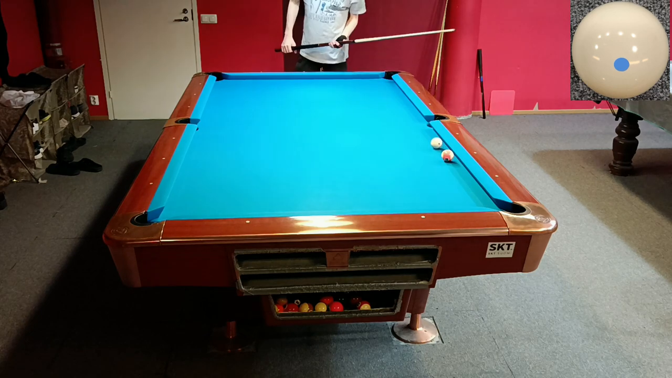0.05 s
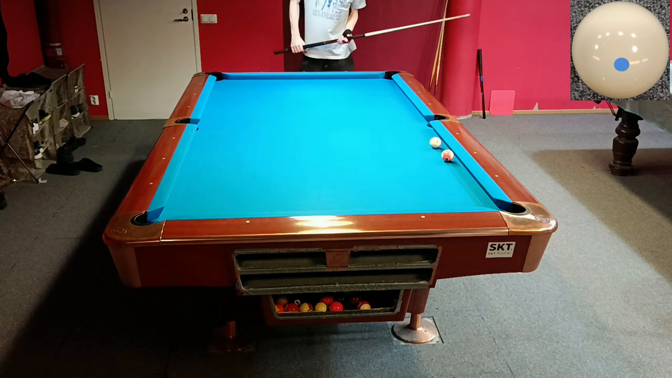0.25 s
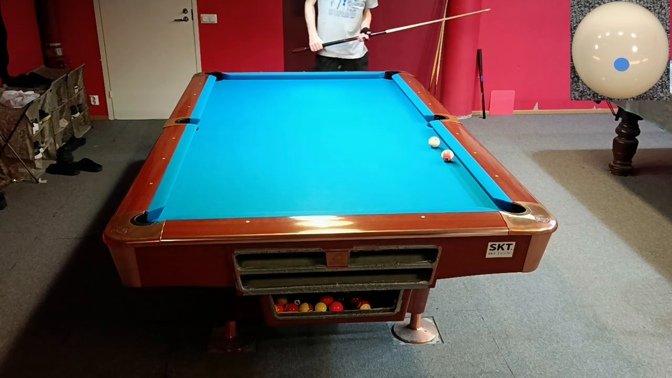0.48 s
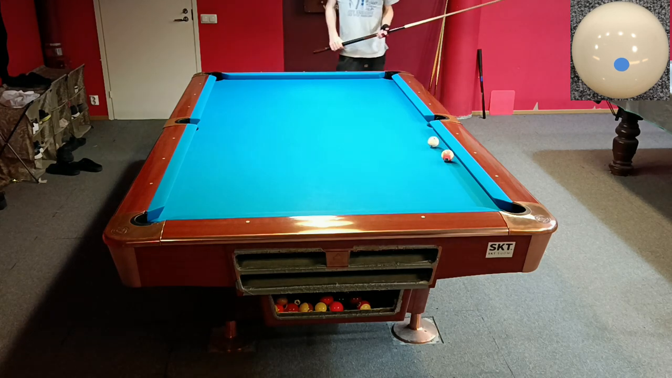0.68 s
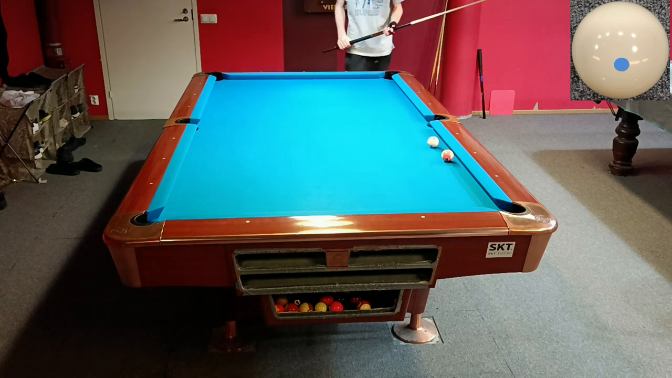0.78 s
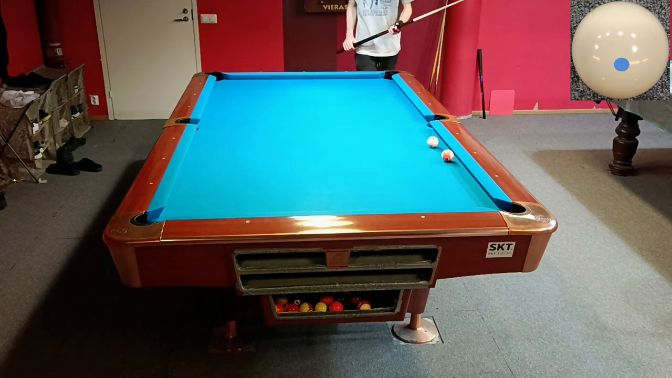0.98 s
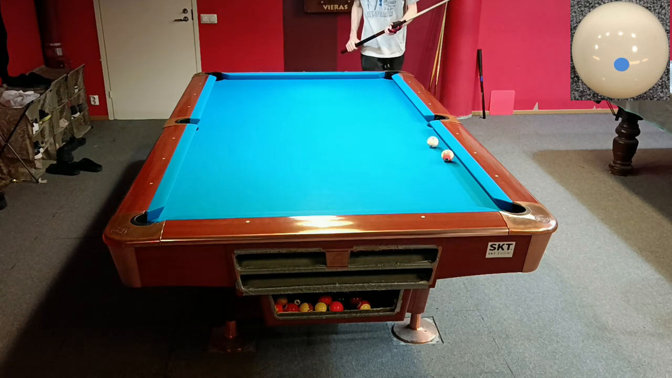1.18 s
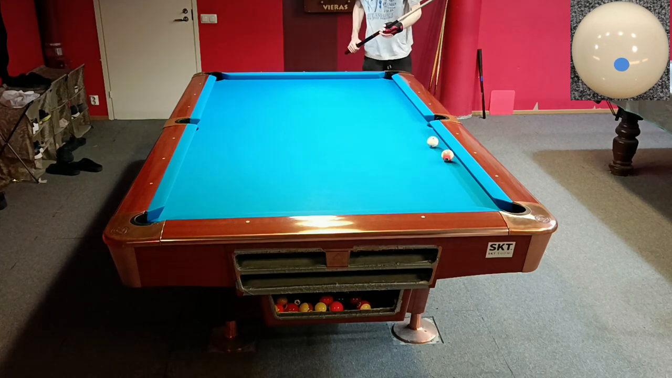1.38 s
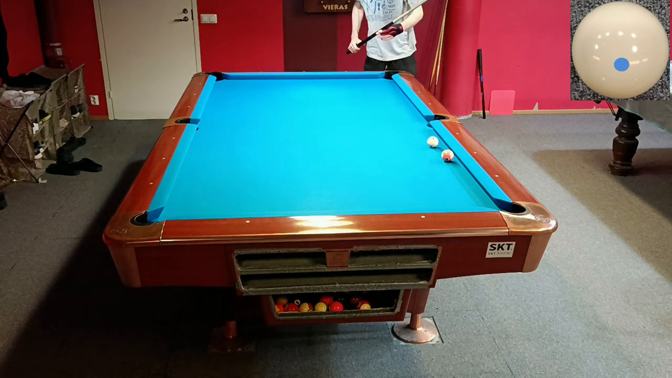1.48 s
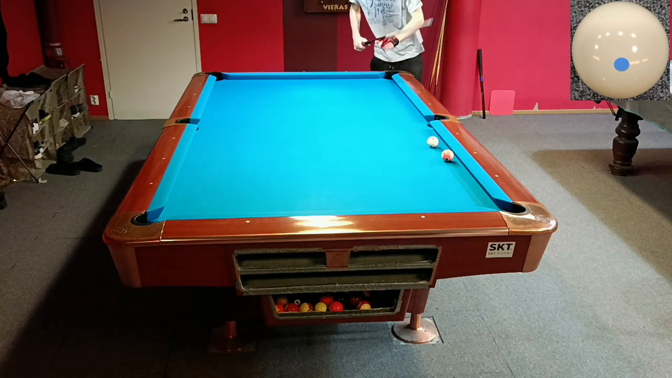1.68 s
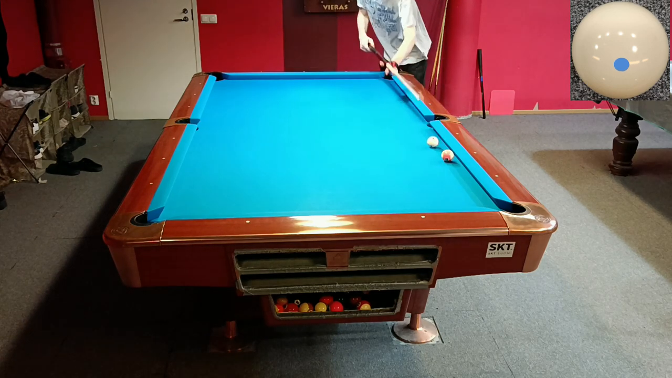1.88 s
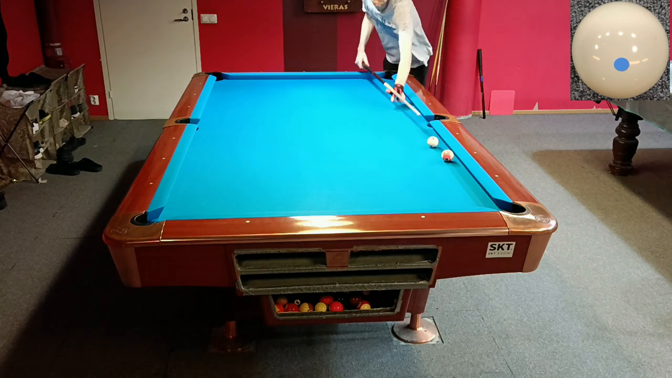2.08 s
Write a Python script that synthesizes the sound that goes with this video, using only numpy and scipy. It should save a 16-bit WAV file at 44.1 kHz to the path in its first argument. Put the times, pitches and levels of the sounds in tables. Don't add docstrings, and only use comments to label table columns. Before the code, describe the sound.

A pool ball drops into a padded pocket, rumbles and knocks along a wooden return channel, then thuds into the tray and clacks against resting balls; close camera microphone in a ringing carpeted hall.

```python
import sys
import numpy as np
from scipy import signal
from scipy.fft import rfft, irfft
from scipy.io import wavfile

SR = 44100
rng = np.random.default_rng(int(sys.argv[2]) if len(sys.argv) > 2 else 0)


def amplitude_ratio(level_db):
    exponent = np.asarray(level_db, float) / 20
    return 10 ** exponent


def wrap_up_sound(samples):
    columns = np.atleast_2d(samples).T
    tamed = np.clip(columns, -1, 1)
    steps = np.round(tamed * 32767).astype(np.int16)
    wavfile.write(sys.argv[1], SR, steps)


N = 92610
T = np.arange(N) / SR

# mode frequency in Hz, level in dB, t60 in seconds
CHANNEL_MODES = [(124.7, -3.5, 0.2), (165.3, -7.5, 0.12), (232, 4, 0.16), (243.2, 0, 0.1), (300, 2, 0.18),
                 (338.5, 4.5, 0.071), (415.7, -6.5, 0.16), (450.5, -2, 0.11), (530, -8.5, 0.03),
                 (723, -1, 0.036), (758, -15, 0.25), (1036, -11, 0.079), (1298, -27, 0.04),
                 (1800, -23.5, 0.017)]
# start in seconds, level in dB, hardness in Hz, scuff level in dB
KNOCKS = [(0.227, -42.5, 1280, -47), (0.281, -37, 475, -77.5), (0.354, -28, 900, -70.5),
          (.400, -27.5, 1593, -51), (0.43, -29, 632, -58.5), (0.464, -33, 900, -64),
          (0.509, -27.5, 700, -61.5), (0.546, -32.5, 700, -70.5), (0.577, -34.5, 700, -72),
          (0.691, -33, 900, -94), (0.759, -38, 491, -92.5)]
# start in seconds, level in dB, hardness in Hz, scuff level in dB
THUDS = [
    (1.050, -20, 1236, -51),
    (1.098, -37, 1375, -57.5),
    (1.112, -22, 506, -76.5),
    (1.174, -29.5, 423, -64),
    (1.212, -27, 518, -70),
]
# start in seconds, level in dB, pitch in Hz
CLACKS = [(1.1847, -18, 1460), (1.1873, -16.5, 2500), (1.189, -27, 1366), (1.194, -19, 2210),
          (1.198, -23, 2800), (1.202, -34, 2330), (1.207, -34, 1400), (1.213, -42, 2180),
          (1.227, -33.5, 1900), (1.232, -32.5, 1100), (1.243, -32, 2250), (1.254, -41, 2690),
          (1.271, -37.5, 1900), (1.286, -36, 2660), (1.308, -26.5, 1730), (1.311, -32.5, 1681),
          (1.318, -35, 1900), (1.334, -35.5, 2690), (1.578, -52, 1800), (1.585, -52, 1223),
          (1.622, -58, 1800), (1.630, -58, 1203)]


def read(table, hz):
    a = np.array(table, float)
    return np.interp(np.log(np.maximum(hz, 1)), np.log(a[:, 0]), a[:, 1])


def unit(x):
    return x / np.sqrt(np.mean(x ** 2))


def colour(x, table):
    log_gain = np.log(amplitude_ratio(read(table, np.linspace(0, SR / 2, 2049))))
    cepstrum = irfft(log_gain)
    cepstrum[1:2048] *= 2
    cepstrum[2049:] = 0
    response = irfft(np.exp(rfft(cepstrum)))
    return signal.fftconvolve(x, response)[:len(x)]


def stereo_noise():
    # frequency in Hz, side over mid in dB
    width = [(60, -21.5), (250, -8.5), (1000, 0.5), (4000, 3), (16000, 9)]
    mid = rng.standard_normal(N)
    side = colour(rng.standard_normal(N), width)
    return np.array([mid + side, mid - side])


def pan(x, db):
    return x * amplitude_ratio(np.array([[db / 2], [-db / 2]]))


def strike(at, db, modes, hard_hz, scatter_db=1.5):
    hz, mode_db, t60 = np.array(modes, float).T[:, :, None]
    chance = rng.standard_normal((2, len(modes), 1))
    t = T - at
    t = t[(t > 0) & (t < 0.4)]
    gain = amplitude_ratio(db + mode_db + scatter_db * chance[0]) / np.sqrt(1 + (hz / hard_hz) ** 4)
    sign = (-1.0) ** np.arange(len(modes))[:, None]
    tone = np.sin(2 * np.pi * hz * (1 + 0.0037 * chance[1]) * t)
    ring = sign * gain * tone * np.exp(-np.log(1000) * t / t60)
    onset = np.sin(np.pi / 2 * np.minimum(t * hard_hz / 2, 1)) ** 2
    out = np.zeros(N)
    start = int(at * SR) + 1
    out[start:start + len(t)] = ring.sum(axis=0) * onset
    return out


def burst(events, table, t60, rise=0.00083):
    env = 0
    for at, db in events:
        swell = np.clip((T - at) / rise, 0, 1)
        env = env + amplitude_ratio(db) * swell * amplitude_ratio(-60 * np.maximum(T - at, 0) / t60)
    return env * unit(colour(rng.standard_normal(N), table))


def air(table):
    return unit(np.array([colour(c, table) for c in stereo_noise()]))


def room_floor():
    # frequency in Hz, level in dB per Hz
    room_colour = [(25, -15.5), (100, 3.5), (230, 2), (450, -12.5), (700, -17), (2000, -24.5),
                   (8000, -49.5), (16000, -47.5)]
    return amplitude_ratio(-62.5) * air(room_colour)


def earlier_hit():
    # frequency in Hz, level in dB per Hz
    tail_colour = [(100, 5), (240, 7), (420, -3), (560, -5.5), (690, -1), (850, -10.5), (3000, -26.5),
                   (7000, -60.5)]
    level_db, t60_s = -40.5, 0.51
    return air(tail_colour) * amplitude_ratio(level_db - 60 * T / t60_s)


def footfalls():
    # start in seconds, level in dB, pitch in Hz
    steps = [(0.036, -35, 72), (0.062, -40.5, 130), (.066, -37, 75), (.1, -47.5, 80), (0.143, -37, 75)]
    t60_s = 0.1
    return sum(strike(at, db, [(hz, 0, t60_s)], 150) for at, db, hz in steps)


def pocket():
    # mode frequency in Hz, level in dB, t60 in seconds
    mouth_modes = [(230, -6.5, .06), (340, -4.5, .06), (520, -18, .03), (724, 3.5, 0.044),
                   (900, -1.5, 0.019), (1115, 0.5, 0.041), (1316, -15, .02), (1673, -3, 0.027),
                   (1900, -1, 0.035), (2320, -25.5, 0.05), (4500, -43.5, 0.04)]
    # start in seconds, level in dB
    drops = [(.2005, -48), (.2035, -38), (.2065, -35.5), (.211, -38), (.2155, -32.5), (.2195, -34),
             (.232, -30.5), (.238, -34.5), (.246, -44)]
    x = sum(strike(at, db, mouth_modes, 2100) for at, db in drops)
    padding = signal.butter(6, 2540, fs=SR, output="sos")
    return signal.sosfilt(padding, x)


def roll():
    # time in seconds, rolling force in dB
    push = [(0, -53), (.2, -61), (.212, -26.5), (.3, -30), (.39, -29), (.42, -27.5), (.54, -26), (.62, -35),
            (.72, -57), (.85, -65.5), (1.04, -67.5), (1.06, -33), (1.15, -33), (1.25, -54), (1.4, -77),
            (2.1, -100)]
    # frequency in Hz, level in dB per Hz
    grit = [(45, -28.5), (120, -10.5), (300, 1.5), (770, -7), (2200, -26.5), (3300, -39.5), (4200, -58.5),
            (16000, -86)]
    bumps_per_s, bump_scatter_db, grit_db = 1500, 2, -7
    chance = rng.random((3, N))
    hit = chance[0] < bumps_per_s / SR
    bumps = hit * np.sign(chance[1] - 0.5) * amplitude_ratio(-bump_scatter_db * np.log(chance[2] + 1e-4))
    bumps = unit(bumps)
    force = bumps * amplitude_ratio(np.interp(T, *np.array(push, float).T))
    wood = 0
    for k, (hz, db, t60) in enumerate(CHANNEL_MODES):
        pole = np.exp(2j * np.pi * hz / SR - np.log(1000) / (t60 * SR))
        wood = wood + (-1) ** k * amplitude_ratio(db) * signal.lfilter([1], [1, -pole], force).imag
    grit_rms = np.sqrt(np.mean(colour(bumps, grit) ** 2))
    return amplitude_ratio(-34.5) * wood + amplitude_ratio(grit_db) * colour(force, grit) / grit_rms


def wall_knocks():
    return sum(strike(at, db - 15, CHANNEL_MODES, hz) for at, db, hz, _ in KNOCKS)


def scuffs():
    # frequency in Hz, level in dB per Hz
    scuff_colour = [(500, -38.5), (2500, 17), (4000, -2), (5800, -1), (7500, -7.5), (9000, -19),
                    (12000, -30.5), (16000, -28)]
    rubs = [(row[0], row[3]) for row in KNOCKS + THUDS]
    rubs += [(at, db - 54.5) for at, db, _ in CLACKS]
    return burst(rubs, scuff_colour, t60=0.21, rise=0.0087)


def cracks():
    # start in seconds, level in dB
    hard_hits = [(.228, -69.5), (.237, -70), (.400, -61.5), (.416, -69.5), (.51, -71.5), (.575, -73.5),
                 (1.049, -63), (1.152, -72), (1.185, -66.5), (1.225, -70.5), (1.24, -79.5), (1.308, -74.5)]
    # frequency in Hz, level in dB per Hz
    crack_colour = [(1500, -19.5), (4000, 6.5), (7000, 5), (9000, -5.5), (12000, -4), (16000, -6)]
    return burst(hard_hits, crack_colour, t60=0.13)


def seams():
    # start in seconds, level in dB, pitch in Hz
    crossings = [(0.2303, -23.5, 340), (.247, -25.5, 300), (0.2771, -24, 230), (0.296, -26.5, 280),
                 (0.334, -22.5, 280), (.365, -25, 300), (1.0565, -19, 311), (0.4293, -15.5, 350),
                 (0.484, -22, 320), (.506, -23.5, 365), (.519, -20, 423), (.530, -21.5, 355),
                 (.543, -20, 270), (.557, -20.5, 315), (.570, -24, 357), (.586, -20.5, 334),
                 (.605, -23, 300), (.633, -20.5, 264), (.654, -27.5, 207), (.70, -27, 257),
                 (1.133, -26, 292), (1.170, -22, 300)]
    t60_s = 0.046
    x = 0
    for at, db, hz in crossings:
        x = x + strike(at, db, [(hz, 0, t60_s), (1.9 * hz, -8, t60_s / 2)], 800)
    return x


def rail_joint():
    # mode frequency in Hz, level in dB, t60 in seconds
    rail_modes = [(514, -1.5, 0.035), (700, 1, 0.056), (900, 3, 0.015), (1100, -4, 0.045), (1340, -3, 0.05),
                  (1570, -16.5, 0.058), (1810, -13.5, 0.04), (2130, -15, 0.046)]
    # start in seconds, level in dB
    joints = [(0.399, -33), (.405, -33), (.412, -33.5), (0.421, -31.5), (.429, -37)]
    return sum(strike(at, db, rail_modes, 2500) for at, db in joints)


def snaps():
    # start in seconds, level in dB
    snap_hits = [(1.0482, -47), (1.051, -56.5), (1.056, -59), (1.064, -63), (1.146, -71), (1.1845, -58),
                 (1.2945, -73), (1.3075, -72)]
    # frequency in Hz, level in dB per Hz
    snap_colour = [(1500, -9), (4000, 0), (9000, -0.5), (13000, -6), (16000, -12)]
    return burst(snap_hits, snap_colour, t60=0.015, rise=0.0003)


def tray_thuds():
    # mode frequency in Hz, level in dB, t60 in seconds
    tray_modes = [(135, -22.5, 0.077), (255.2, -6, 0.093), (299.8, 3, 0.055), (349.4, -5.5, 0.043),
                  (421, 7, 0.033), (566, -4.5, 0.034), (700, 9, 0.027), (828, -6, 0.025), (1128, 1, 0.037),
                  (1320, 7.5, 0.0096), (1637, -21, 0.054), (2026, -10.5, 0.077), (2500, -16, .03)]
    return sum(strike(at, db - 1.5, tray_modes, hz) for at, db, hz, _ in THUDS)


def board_rattle():
    # frequency in Hz, level in dB per Hz
    rattle_colour = [(400, -22), (900, 6), (1600, -4), (2400, -18), (4000, -55)]
    shakes = [(at, db - 20.5) for at, db, _, _ in THUDS[:2]]
    return burst(shakes, rattle_colour, t60=0.71)


def pings():
    # mode frequency in Hz, level in dB, t60 in seconds
    ping_modes = [(15400, -0.5, .012), (14700, -4.5, .015), (9300, -4.5, .006), (7200, -5, .006)]
    # start in seconds, level in dB
    strokes = [
        (1.184, -55),
        (1.308, -74),
    ]
    return sum(strike(at, db, ping_modes, 20000) for at, db in strokes)


def clacks():
    # frequency in Hz, level in dB per Hz
    ball_colour = [(300, -18), (900, 2.5), (1450, -0.5), (2200, 4), (2700, -6.5), (3150, -16), (4200, -25),
                   (16000, -65)]
    clack_q, echo_t60_s, echo_db = 3.8, 0.021, -3
    x = 0
    for at, db, hz in CLACKS:
        pulse = amplitude_ratio(db) * (np.arange(N) == int(at * SR))
        x = x + signal.lfilter(*signal.iirpeak(hz, clack_q, SR), pulse)
    echo = rng.standard_normal(4000) * amplitude_ratio(-60 * T[:4000] / echo_t60_s)
    echo = echo / np.sqrt(np.sum(echo ** 2))
    x = x + amplitude_ratio(echo_db) * signal.fftconvolve(x, echo)[:N]
    return amplitude_ratio(28) * colour(x, ball_colour)


def jingles():
    # start in seconds, level in dB, hardness in Hz
    touches = [(1.860, -73, 5000), (1.889, -71.5, 6950), (1.903, -74, 4000), (1.945, -70, 2140),
               (1.955, -72.5, 7130), (1.964, -83, 15200), (2.003, -74.5, 3000), (2.02, -86, 3000),
               (2.03, -85.5, 8000), (2.057, -88, 3920), (.932, -81, 2000)]
    # mode frequency in Hz, level in dB, t60 in seconds
    metal_modes = [(1723, -8.5, 0.035), (2070, -8, 0.06), (2590, -8.5, 0.064), (3670, -4.5, 0.054),
                   (4790, -5.5, 0.05), (5050, -15, .05), (5830, -4, 0.048), (6840, -7, .05),
                   (7700, -13.5, 0.06), (8330, -24.5, 0.052), (10000, -15, 0.04), (13950, -20, 0.04),
                   (15300, -11.5, 0.042)]
    # frequency in Hz, level in dB per Hz
    rustle_colour = [(600, 2), (1500, 0.5), (2600, 2.5), (5000, -5), (8000, -14.5), (16000, -24.5)]
    ring = sum(strike(at, db + 11, metal_modes, hz, scatter_db=3) for at, db, hz in touches)
    rubs = [(at, db + 3) for at, db, _ in touches]
    return ring + burst(rubs, rustle_colour, t60=0.18, rise=0.008)


def hall(x):
    # frequency in Hz, t60 in seconds
    decay = [(60, 1.64), (250, 0.76), (1000, 0.56), (3000, 0.47), (8000, 0.23), (16000, 0.16)]
    level_db, gap_s, build_s = 0.5, 0.0025, 0.0021
    f, t, z = signal.stft(stereo_noise()[:, :SR], SR, nperseg=256)
    z = z * amplitude_ratio(-60 * t / read(decay, f)[:, None])
    tail = signal.istft(z, SR, nperseg=256)[1]
    t = np.arange(tail.shape[1]) / SR
    tail = tail * np.clip((t - gap_s) / build_s, 0, 1)
    tail = tail / np.sqrt(np.sum(tail ** 2) / 2)
    return amplitude_ratio(level_db) * signal.fftconvolve(x[None], tail, axes=1)[:, :N]


def scene():
    low = footfalls()
    table = pocket() + roll() + wall_knocks() + seams() + rail_joint()
    table = table + tray_thuds() + board_rattle() + clacks()
    hiss = scuffs() + cracks() + snaps() + pings()
    metal = jingles()
    into_hall = table + amplitude_ratio(-14.5) * low + amplitude_ratio(-5.5) * hiss + amplitude_ratio(-4) * metal
    mix = pan(table + low + hall(into_hall), 1.2)
    mix = mix + pan(hiss, 6) + pan(metal, 0)
    return mix + room_floor() + earlier_hit()


def roll_off(x):
    return signal.sosfilt(signal.butter(12, 15790, fs=SR, output="sos"), x)


def record(dry):
    low_cut = signal.butter(3, 61, "high", fs=SR, output="sos")
    dry = signal.sosfilt(low_cut, dry)
    dry = np.array([np.roll(dry[0], shift=3), dry[1]])
    return roll_off(dry)


dry = scene()
out = record(dry)
wrap_up_sound(out)
```